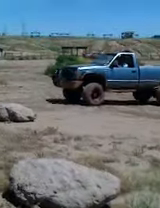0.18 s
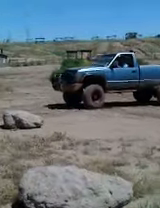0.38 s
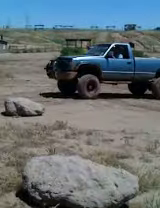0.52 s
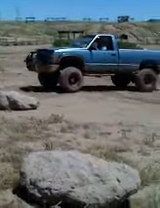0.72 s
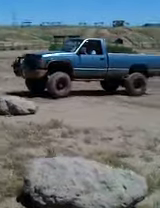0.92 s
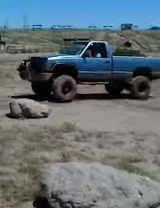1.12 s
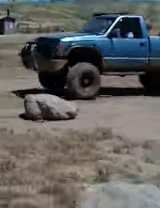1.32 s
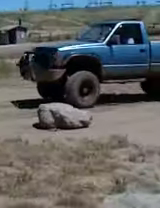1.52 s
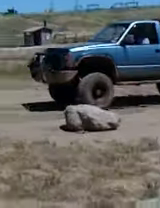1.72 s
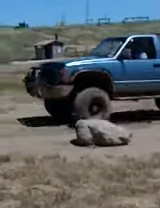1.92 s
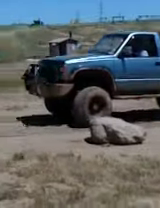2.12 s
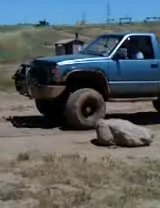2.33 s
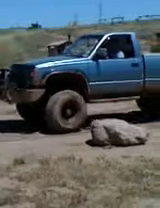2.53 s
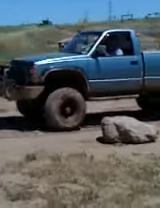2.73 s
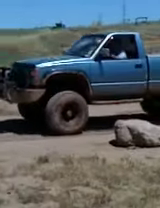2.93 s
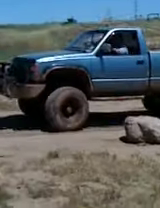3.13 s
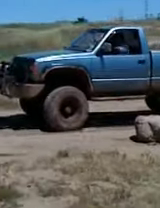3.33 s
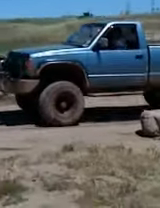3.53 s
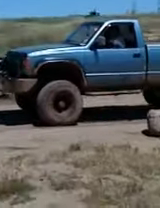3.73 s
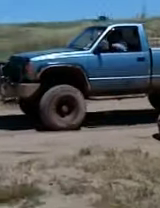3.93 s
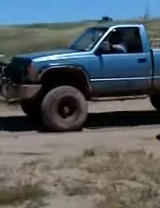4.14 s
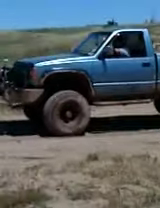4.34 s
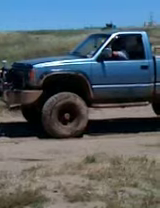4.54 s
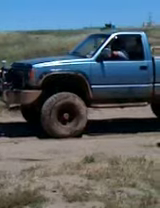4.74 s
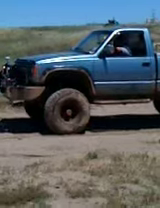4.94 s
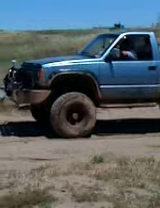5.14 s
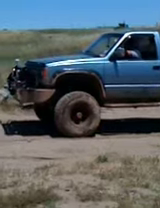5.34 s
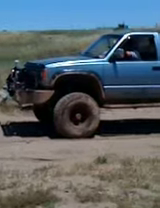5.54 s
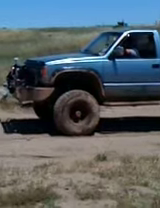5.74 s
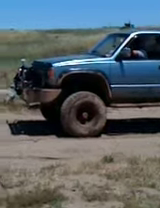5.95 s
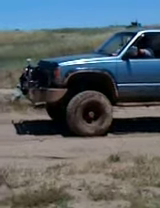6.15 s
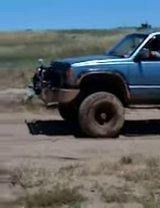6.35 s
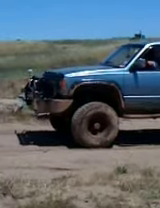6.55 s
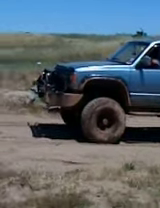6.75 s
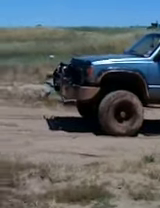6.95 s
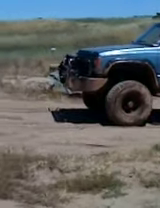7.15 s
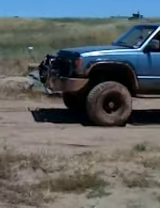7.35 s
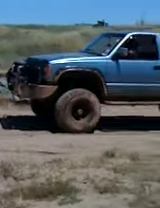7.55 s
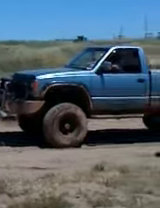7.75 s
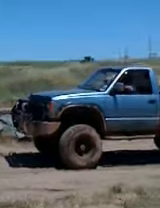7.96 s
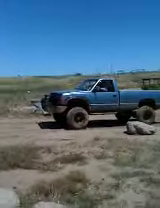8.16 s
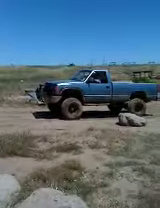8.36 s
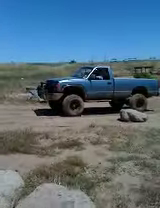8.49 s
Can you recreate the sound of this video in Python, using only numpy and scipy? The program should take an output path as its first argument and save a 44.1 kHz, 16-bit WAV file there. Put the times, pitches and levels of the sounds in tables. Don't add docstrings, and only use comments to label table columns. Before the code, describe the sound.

A big pickup's deep throbbing exhaust swells, drops abruptly to a soft lumpy idle, then creeps on with gravel snaps and low wind thuds.

```python
import sys
import numpy as np
from scipy import signal
from scipy.fft import rfft, irfft
from scipy.io import wavfile
from scipy.ndimage import uniform_filter1d

SR = 44100
rng = np.random.default_rng(int(sys.argv[2]) if len(sys.argv) > 2 else 0)


def transcribe(signal):
    frames = np.atleast_2d(signal).T
    limited = np.clip(frames, -1, 1)
    pcm = np.round(limited * 32767).astype(np.int16)
    wavfile.write(sys.argv[1], SR, pcm)


def natural_amplitude(level_db):
    exponent = np.asarray(level_db, float) / 20
    return 10 ** exponent


N = 382523

# time_s, firing_level_db
THROTTLE = [(0.0, -25), (1.0, -24), (1.5, -23.5), (2.0, -22.5), (2.1, -22), (2.2, -31), (2.45, -35.5),
            (2.95, -39.5), (3.3, -36), (3.7, -35.5), (4.5, -35.5), (4.8, -40), (5.15, -36), (5.5, -36.5),
            (6.35, -40.5), (6.9, -33), (7.25, -32.5), (8.68, -36)]
# time_s, rush_level_db
ROLLING = [(0.0, -57.5), (0.8, -57), (2.07, -56.5), (2.3, -61.5), (2.5, -58.5), (3.0, -63), (3.26, -63),
           (3.36, -58.5), (4.0, -60), (4.15, -62.5), (4.7, -62), (5.26, -63), (5.65, -60.5), (6.0, -63),
           (6.6, -62), (7.2, -59), (7.45, -58.5), (8.67, -58)]
GRIT_TOP_HZ = 11500


def curve(table, t):
    s, *columns = np.transpose(table)
    return [np.interp(t, s, c) for c in columns]


def walk(rate_hz, count=N, sr=SR):
    k = int(sr / rate_hz)
    held = np.repeat(rng.standard_normal(count // k + 1), k)
    w = uniform_filter1d(uniform_filter1d(held, k), k)[:count]
    return w / np.std(w)


def colour(x, shape, sr=SR):
    hz, db = np.transpose(shape)
    log_hz = np.log(np.arange(len(x) // 2 + 1) * sr / len(x) + 1)
    gain = natural_amplitude(np.interp(log_hz, np.log(hz), db, left=-90, right=-90))
    y = irfft(rfft(x) * gain, len(x))
    return y / np.std(y)


def band(x, lo_hz, hi_hz):
    y = signal.sosfilt(signal.butter(2, [lo_hz, hi_hz], "band", fs=SR, output="sos"), x)
    return y / np.std(y)


def ring_in_spells(x, resonances):
    out = x
    for hz, width_hz, db in resonances:
        ring = signal.lfilter(*signal.iirpeak(hz, hz / width_hz, SR), x)
        out = out + natural_amplitude(db + 2.2 * walk(11.0)) * ring
    return out


def exhaust():
    # time_s, cycle_hz
    engine_speed = [(0.0, 8.613), (0.78, 8.697), (1.37, 8.51), (1.97, 8.647), (2.1, 8.292), (2.35, 5.915),
                    (2.75, 5.018), (3.12, 4.967), (3.41, 5.535), (3.67, 5.616), (4.48, 5.145),
                    (4.82, 4.612), (5.38, 5.269), (6.14, 4.635), (6.56, 4.741), (6.99, 6.152), (7.3, 6.408),
                    (8.68, 5.92)]
    # pitch_hz, both_banks_db, bank_against_bank_db
    pipes = [(27.4, -16, -36.5), (45, -3.5, -18.5), (55.8, -14, -7.5), (64.5, -1.5, 3.5), (69.2, 0, 3),
             (72.3, -17.5, 1.5), (94.6, -7, -5), (100.2, -9.5, -14.5), (112, 2, -13), (116.9, 1.5, -12),
             (120.8, 1.5, -2), (126, -2.5, -17), (130.4, -12.5, -36), (139.5, -13.5, -34.5),
             (159, -14.5, -23.5), (183.5, -24, -40.5), (237.3, -48, -26.5)]
    firing_banks = [1, -1, -1, 1, -1, 1, 1, -1]
    header_turn = [0, -.7, 0, -.5, 0, .3, 0, -.9]
    favour = {12: -3, 14: -3, 15: 2, 16: 3.5, 17: 7.5, 18: 3, 19: -4, 20: 4, 21: 5, 22: 7, 25: 9, 27: -4,
              32: -4}
    # time_s, change_above_turning_pitch_db
    shade = [(0, 0.5), (2.07, -0.5), (2.17, -4.5), (2.29, 0.5), (2.4, -1.5), (3.3, 5), (4.3, 0.5), (6.6, 1),
             (7.1, -16.5), (7.7, -26), (8.1, -8.5), (8.68, -21)]
    shade_hz = 101.5
    lead_ms, path_turn_rad = (10.6, 1.9), (-1.9, 1.3)
    mismatch_db, mismatch_turn_rad = -15, {2: -1.3, 4: 2.5, 6: 1.0}
    above_db, below_db, overtone_db = -13.5, -26.5, -13.5
    next_db = above_db, below_db, overtone_db
    next_db = -13.5, -26.5, -13.5
    shut_db, idle_wobble_db = -30, .8
    rough_db, even_db = -22.5, -27.5

    step = 49
    sr, count = SR / step, N // step + 1
    t = np.arange(count) / sr
    hz, load = curve(engine_speed, t)[0], natural_amplitude(curve(THROTTLE, t)[0])
    shade_db = curve(shade, t)[0]
    overrun_db = -11 * np.exp(-.5 * ((t - 2.245) / .06) ** 2)
    loose_db = idle_wobble_db * np.clip(1 - load / natural_amplitude(shut_db), 0, .5) * 2
    cycle = np.cumsum(hz) / sr - .1
    pipe_hz, *pipe_db = np.transpose(pipes)
    bank_phase = np.angle(np.fft.fft(firing_banks))

    orders = 0
    for k in range(3, 46):
        path = int(k % 8 > 0)
        even = k % 2 == 0 and k % 8 > 0
        db = np.interp(np.log(k * hz), np.log(pipe_hz), pipe_db[path], right=-70)
        db = db + (.6 + loose_db * (k > 13)) * walk(3.003, count, sr)
        if k % 8 in (1, 7):
            db = db + next_db[(k < 8) + 2 * (k > 12)]
        db = db + mismatch_db * even + favour.get(k, 0)
        db = db + shade_db * np.clip(k * hz / shade_hz - .8, 0, .3) / .3
        db = db + overrun_db * (1 - path) * (k > 8)
        shift = mismatch_turn_rad[k % 8] if even else bank_phase[k % 8] * path
        if not even:
            shift += path_turn_rad[path] + header_turn[k % 8] * (k > 10) + .7 * (k == 16)
        else:
            shift += path_turn_rad[path] + header_turn[k % 8] * (k > 10)
        orders = orders + natural_amplitude(db) * np.cos(2 * np.pi * k * (cycle + hz * lead_ms[path] / 1000) + shift)

    scatter = colour(rng.standard_normal(count), np.c_[pipe_hz, np.maximum(*pipe_db)], sr)
    rumble = load * orders + np.minimum(load, natural_amplitude(even_db)) * scatter * natural_amplitude(rough_db)
    full_cycle = np.interp(np.arange(N) / step, np.arange(count), cycle)
    return signal.resample_poly(rumble, step, 1)[:N], full_cycle


def drive_over_crawl():
    t = np.arange(N) / SR
    return curve(THROTTLE, t)[0] + 34, curve(ROLLING, t)[0] + 62


def gas_hiss():
    # pitch_hz, density_db
    gas_shape = [(82, -18), (140, -0.5), (151, -14.5), (232, -15), (269, -19), (318, -22), (356, -23.5),
                 (450, -25.5), (580, -55.5), (990, -120)]
    load_db, roll_db = drive_over_crawl()
    level_db = -56.5 + 0.17 * load_db + 0.22 * roll_db
    gas = colour(rng.standard_normal(N), gas_shape) * natural_amplitude(level_db + walk(9) + 4.5)
    return gas + natural_amplitude(0.5) * signal.lfilter(*signal.iirpeak(232, 6, SR), gas)


def engine_roar(cycle):
    # pitch_hz, density_db
    roar_shape = [(190, -39.5), (330, 0.5), (442, -4), (506, 4), (542, 3), (604, 1.5), (711, -2),
                  (845, -11.5), (1200, -4), (1560, -38), (2640, -120)]
    # pitch_hz, width_hz, level_db
    cavities = [(333, 26, -9), (403, 39, -7.5), (552, 45, -12.5), (623, 45, -7.5), (700, 56, -8)]
    load_db, roll_db = drive_over_crawl()
    fade = int(0.5 * SR)
    lingering_db = np.maximum(load_db, uniform_filter1d(load_db, fade, origin=(fade - 1) // 2))
    level_db = -64 + 0.73 * lingering_db + 0.39 * roll_db
    puff = 1 + 0.2 * np.cos(2 * np.pi * 8 * cycle)
    roar = colour(puff * rng.standard_normal(N), roar_shape) * natural_amplitude(level_db + .5 * walk(14))
    return ring_in_spells(roar, cavities) * natural_amplitude(-1.2)


def fan_and_tyres():
    # pitch_hz, density_db
    rush_shape = [(470, -12.5), (800, 1), (1040, -4), (1200, -5), (1440, -5), (1530, -4.5), (2070, -5.5),
                  (2510, -7), (3000, -10.5), (3400, -13), (3800, -12), (4580, -11.5), (6360, -9.5),
                  (10200, -23.5), (12000, -37.5), (15600, -64), (22000, -120)]
    # pitch_hz, width_hz, level_db
    panels = [(950, 49, -14.5), (1200, 58, -8.5), (1510, 80, -5), (1710, 80, -10), (2060, 84, -5.5),
              (2450, 80, -9), (3630, 74, -10), (4000, 150, -5), (4600, 220, -3), (4980, 170, -8.5),
              (5320, 110, -12.5), (5730, 96, -13), (6220, 110, -13.5)]
    rush_db = curve(ROLLING, np.arange(N) / SR)[0]
    rush = colour(natural_amplitude(.5 * walk(25) + walk(90)) * rng.standard_normal(N), rush_shape)
    rush = ring_in_spells(rush, panels) * natural_amplitude(-0.98)
    dust = signal.sosfilt(signal.butter(4, 6500, "high", fs=SR, output="sos"), rush)
    dust_db = rush_db - 11.5 + 5.5
    return (rush - dust) * natural_amplitude(rush_db + 0.42) + dust / np.std(dust) * natural_amplitude(dust_db)


def snaps(grains, dull):
    # time_s, peak_db, pitch_hz, dull_part_db
    snapping_stones = [(.3278, -43, 8380, -56), (.3394, -33, 6870, -53), (.3458, -44, 9800, -56),
                       (.8724, -46, 7500, -49), (.9335, -48, 9000, -54), (1.045, -48, 6600, -58),
                       (1.2892, -36, 6800, -55), (1.6314, -44, 8540, -52), (1.689, -45, 6650, -51),
                       (4.3457, -33, 9310, -62), (4.4788, -47, 5410, -60), (5.077, -53, 7500, -66),
                       (6.8453, -54, 5530, -56), (7.0488, -45, 10600, -59), (7.1435, -50, 6500, -56),
                       (7.222, -54, 7500, -62), (7.4618, -44, 7630, -56), (7.5465, -49, 7580, -48),
                       (7.5698, -39, 7500, -44), (7.705, -43, 8120, -52), (7.9162, -40, 7000, -52),
                       (8.1209, -51, 7500, -57), (8.3468, -49, 8000, -60), (8.3565, -37, 9700, -53),
                       (8.357, -39, 7000, -60), (8.383, -50, 6500, -60), (8.4324, -46, 7900, -55),
                       (8.433, -51, 9800, -62)]
    out, t = np.zeros(N + SR), np.arange(SR // 4) / SR
    for s, db, hz, dull_db in snapping_stones:
        at = slice(int(s * SR), int(s * SR) + len(t))
        ring = np.sin(2 * np.pi * hz * t) * natural_amplitude(-60 * t / 0.0029)
        ring += 0.41 * band(grains[at], 0.46 * hz, GRIT_TOP_HZ) * natural_amplitude(-60 * t / 0.0026)
        ring += 0.2 * np.sin(2 * np.pi * 11600 * t) * natural_amplitude(-60 * t / 0.002)
        ring += natural_amplitude(-26 - 60 * t / 0.023) * band(grains[at], 0.87 * hz, GRIT_TOP_HZ)
        out[at] += natural_amplitude(db) * ring + natural_amplitude(dull_db - 5.0 - 60 * t / 0.034) * dull[at]
    return out


def crushing_and_rubbing(grains):
    # start_s, length_s, low_edge_hz, level_db
    grit = [(0.284, 0.054, 3500, -64.5), (0.328, 0.033, 4000, -56), (0.937, 0.024, 2000, -57.5),
            (0.98, 0.018, 2000, -58), (1.001, 0.049, 2980, -60), (1.056, .018, 7000, -66),
            (1.583, 0.17, 1000, -57.5), (2.498, 0.096, 2000, -60.5), (3.29, 0.82, 3900, -74),
            (5.34, 0.5, 3920, -71), (6.105, 0.045, 4000, -63.5), (7.317, 0.055, 5440, -60),
            (7.556, 0.025, 6000, -52.5), (7.568, 0.047, 5000, -61), (7.695, 0.019, 5500, -59.5),
            (7.733, 0.043, 6000, -58.5), (7.748, 0.11, 6000, -61.5), (8.33, 0.033, 6500, -61),
            (8.352, 0.014, 2500, -54), (8.362, 0.034, 5500, -63), (8.613, 0.038, 5000, -67)]
    # start_s, length_s, middle_hz, level_db
    crunches = [(0.715, 0.059, 2600, -59), (0.769, 0.054, 2200, -56), (1.952, 0.04, 4170, -67),
                (2.41, 0.04, 1200, -63), (2.507, 0.091, 1190, -53), (6.408, 0.073, 1500, -57.5),
                (6.414, .025, 4500, -69), (6.933, 0.059, 1800, -60), (7.743, 0.086, 2900, -54.5),
                (7.579, 0.046, 1500, -63), (7.317, 0.18, 700, -54), (7.4, 0.03, 900, -56),
                (7.397, 0.028, 3400, -58), (7.554, 0.035, 1560, -52.5), (8.465, 0.031, 6000, -60),
                (8.491, 0.043, 4000, -59), (8.592, 0.044, 3100, -57)]
    # start_s, length_s,
    # pitch_hz, level_db
    rubs = [(2.17, 0.16, 121, -48.5), (2.273, 0.27, 160, -55), (3.5, 0.48, 2310, -74),
            (4.605, .32, 4620, -75), (4.75, 0.15, 5700, -74), (3.3, 0.5, 2070, -66.5),
            (5.45, 0.47, 2070, -69.5), (6.21, 0.092, 2220, -64), (6.5, 0.053, 2110, -64.5),
            (0.753, 0.25, 257, -62), (1.98, .1, 285, -54.5), (2.11, 0.28, 199, -65),
            (4.1, 0.63, 309, -64.5), (4.398, 1.05, 396, -65.5), (7.1, 0.65, 320, -59),
            (7.75, 0.33, 319, -60), (7.75, 0.49, 384, -69)]
    swarms = [(s, length, hz, GRIT_TOP_HZ, db) for s, length, hz, db in grit]
    for table, spread in ((crunches, 2.6), (rubs, 1.06)):
        swarms += [(s, length, hz / spread, hz * spread, db) for s, length, hz, db in table]
    out = np.zeros(N + SR)
    for s, length, lo_hz, hi_hz, db in swarms:
        at = slice(int(s * SR), int((s + length) * SR))
        n = at.stop - at.start
        sink_db = np.linspace(.5, -.5, n) * 7 * (length < .065)
        out[at] += natural_amplitude(db + sink_db) * signal.windows.tukey(n, .7) * band(grains[at], lo_hz, hi_hz)
    return out


def knocks(dull):
    # time_s, peak_db, pitch_hz, decay_s, tone_share
    knock_events = [(.081, -36, 690, 0.048, 0.85), (.195, -44, 720, 0.047, 1),
                    (.74, -46, 1800, 0.016, 0.3), (0.9804, -43.5, 1710, 0.034, 0.14),
                    (.953, -45, 2900, 0.016, 0.7), (.99, -47, 4270, .015, 0.7),
                    (1.006, -42, 900, .015, .3), (1.1002, -40, 1300, 0.018, 0.3),
                    (1.173, -38.5, 1200, 0.01, 0.46), (1.369, -45, 1500, 0.02, 0.35),
                    (1.629, -42, 900, .015, 0.6), (2.089, -45, 1510, 0.0084, 0.06),
                    (2.297, -44, 1150, 0.027, 0.5), (2.3446, -48, 1700, 0.0081, 0.3),
                    (2.349, -42, 1100, 0.02, 0.9), (2.43, -43, 1100, 0.011, 0.5),
                    (2.501, -50, 700, .02, 0.4), (2.531, -46, 1100, 0.014, 0.5),
                    (2.54, -50, 2000, 0.013, 0.1), (2.564, -52, 900, 0.018, 0.6),
                    (2.888, -51, 1760, 0.013, 0.6), (6.325, -45.5, 562, 0.1, 0.8),
                    (6.415, -46, 1055, .05, 0.95), (6.425, -51, 1800, 0.076, 0.9),
                    (6.846, -47, 3350, 0.01, 1), (7.146, -50, 3320, 0.011, 1),
                    (7.181, -35.5, 232, 0.089, 0.94), (6.219, -43, 2380, 0.017, 0.8),
                    (6.22, -53, 650, 0.055, 1), (6.438, -50, 2650, 0.023, 0.6),
                    (6.454, -51, 645, .03, 0.9), (6.507, -55, 2200, 0.016, 0.4),
                    (7.415, -43, 1300, 0.029, .3), (7.543, -56, 900, 0.013, 0.65),
                    (7.567, -40, 2500, 0.014, 0.7), (7.573, -46, 885, 0.023, 0.8),
                    (7.597, -49, 900, .02, 0.3), (7.881, -36, 126, 0.75, 1), (7.566, -42, 1850, .025, 1),
                    (7.71, -44, 840, 0.02, 0.4), (7.916, -42.5, 2050, .015, 1),
                    (.297, -53, 4120, .015, 1), (.665, -55, 4030, 0.018, .9), (0.74, -44, 2900, .015, .9),
             (.757, -47, 1600, 0.022, .8), (.79, -51, 3300, 0.02, 0.7), (.812, -49, 2600, .015, .6),
             (.824, -47, 1500, .02, .8), (.872, -43, 1900, .012, 0.9), (.991, -50, 2100, .015, .7),
             (1.507, -47, 4250, .02, .9), (1.65, -39, 950, 0.034, .7), (2.298, -49, 1700, .025, 0.87),
             (2.351, -47, 610, .03, .8), (2.648, -47, 650, .03, 0.74), (2.728, -53, 1600, .03, .9),
             (3.336, -49, 1570, 0.034, 0.7), (4.295, -55, 3500, .012, .7), (6.0, -63, 5800, 0.054, 0.9),
             (6.111, -53, 4900, .025, 0.8), (6.119, -55, 5500, .02, 0.8), (6.25, -53, 2150, .025, .9),
             (6.291, -49, 2120, .03, .9), (6.309, -53, 2250, 0.025, .8), (6.351, -52, 2270, .025, .9),
             (6.419, -52, 4600, 0.033, .9), (6.42, -52, 2700, .02, .8), (6.427, -53, 5300, .015, .7),
             (6.476, -54, 2510, .03, .9), (7.481, -39, 345, 0.031, 0.86), (7.583, -39, 420, .03, 0.66),
             (7.712, -48, 1350, .015, .6), (7.715, -49, 5500, .015, .9), (7.88, -48, 192, 0.54, 0.9),
             (7.9164, -47.5, 4800, .008, 0.7), (8.055, -44, 520, 0.022, .8), (8.107, -54, 5040, .015, 0.7),
             (8.437, -53, 5300, .015, 0.8), (8.508, -46, 4270, .025, 0.8), (8.604, -48.5, 3100, 0.03, 0.9),
             (8.612, -53, 7000, 0.016, .8)]
    rise_cycles, click_cycles = .5, 2
    out, t = np.zeros(N + SR), np.arange(SR // 4) / SR
    for s, db, hz, t60_s, tone in knock_events:
        at = slice(int(s * SR), int(s * SR) + len(t))
        db = db + 20 * np.log10(1.001 - np.exp(-t * hz / rise_cycles))
        sine = np.sin(2 * np.pi * hz * t)
        out[at] += natural_amplitude(db - 60 * t / t60_s) * (tone * sine + (1 - tone) * dull[at])
        out[at] += natural_amplitude(db + 14 - 30 * t * hz / click_cycles) * (1 - tone) * sine
    return out


def gravel():
    dull = band(rng.standard_normal(N + SR), 580, 2720)
    uneven_db = 2.5 * walk(1500, N + SR) + 1.5 * walk(200, N + SR)
    grains = rng.standard_normal(N + SR) * natural_amplitude(uneven_db)
    grains = colour(grains, [(300, 15.0), (3000, -3.5), (8000, -4.0), (10500, -10.5), (12500, -26.5)])
    return (snaps(grains, dull) + crushing_and_rubbing(grains) + knocks(dull))[:N]


def squeaks():
    # start_s, length_s, start_hz, end_hz, level_db
    squeak_events = [(1.955, 0.056, 2410, 2460, -55), (2.804, 0.048, 1540, 1550, -60),
                     (6.165, 0.03, 2620, 2450, -62), (6.21, 0.026, 2170, 2100, -61),
                     (6.249, 0.08, 2120, 2200, -69), (6.925, .045, 10100, 10100, -77),
                     (1.255, .03, 7200, 7250, -64), (6.319, 0.029, 2270, 2300, -53),
                     (8.276, 0.051, 3530, 3640, -57), (8.3, 0.057, 3630, 3600, -59),
                     (8.488, 0.035, 10150, 10120, -63), (8.494, .032, 5150, 5100, -61),
                     (8.548, 0.025, 9950, 10050, -69), (8.562, .024, 10050, 10600, -68),
                     (8.493, .03, 11950, 11900, -75), (8.562, .022, 12100, 11300, -76),
                     (8.278, .03, 6950, 6950, -61), (8.308, .03, 7350, 7400, -63)]
    out = np.zeros(N)
    for s, length, hz0, hz1, db in squeak_events:
        n = int(length * SR)
        hz = np.linspace(hz0, hz1, n) * (1 + 40 / hz0 * walk(590, n))
        phase = 2 * np.pi * np.cumsum(hz) / SR
        tone = np.sin(phase) + natural_amplitude(-21) * np.sin(2 * phase)
        swell = natural_amplitude(db + 1.5 + 1.6 * walk(263, n)) * signal.windows.tukey(n, .8)
        out[int(s * SR):int(s * SR) + n] += swell * tone
    return out


def far_motor():
    # start_s, length_s, start_hz, end_hz, level_db
    windups = [
        (4.2, 1.95, 161, 184, -58.5),
        (3.1, 3.4, 120, 200, -64),
        (4.597, 2.8, 218.4, 253.6, -66.5),
    ]
    out = np.zeros(N)
    for s, length, hz0, hz1, db in windups:
        n = int(length * SR)
        phase = 2 * np.pi * np.cumsum(np.linspace(hz0, hz1, n) + 0.94 * walk(8, n)) / SR
        swell = natural_amplitude(db + 5.5 + 1.4 * walk(5.83, n)) * signal.windows.tukey(n, .5)
        out[int(s * SR):int(s * SR) + n] += swell * np.sin(phase)
    return out


def wind():
    # peak_time_s, length_s, peak_db
    gust_events = [(.34, 0.33, -43), (1.54, 0.99, -52), (2.153, 0.34, -51), (2.95, 0.22, -54),
                   (3.784, 0.14, -40.5), (4.05, 0.27, -48), (4.258, 0.11, -32), (4.43, 0.16, -32.5),
                   (4.847, 1, -46.5), (5.284, 1, -40.5), (5.738, 0.48, -51), (6.26, 0.22, -53),
                   (7.09, 1, -40.5), (7.507, .15, -52), (7.75, 0.098, -43), (8.134, 0.27, -48.5),
                   (8.6, 0.46, -51)]
    t = np.arange(N) / SR
    strength = natural_amplitude(-50)
    for s, length, db in gust_events:
        strength = strength + natural_amplitude(db) * np.exp(-.5 * (4 * (t - s) / length) ** 2)
    shape = [(4, -23), (12, -14.0), (24, -5.5), (40, -9.5), (65, -2.5), (110, -7.5), (200, -21.0)]
    return colour(rng.standard_normal(N), shape) * strength * natural_amplitude(-0.5)


def scene():
    rumble, cycle = exhaust()
    truck = rumble + gas_hiss() + engine_roar(cycle) + fan_and_tyres()
    return (truck + gravel() + squeaks() + far_motor() + wind())[None]


def low_pass(x):
    return signal.sosfilt(signal.butter(12, 12240, fs=SR, output="sos"), x)


def record(dry):
    mix = signal.sosfilt(signal.butter(10, 11300, fs=SR, output="sos"), dry)
    return low_pass(mix)


dry = scene()
out = record(dry)
transcribe(out)
```